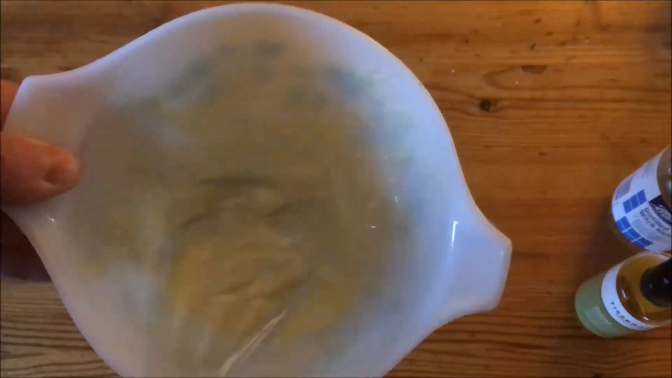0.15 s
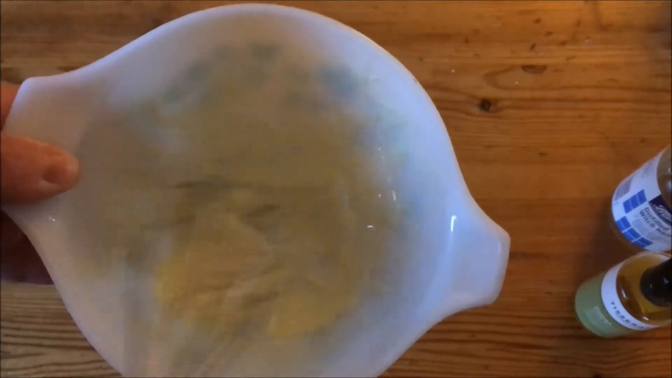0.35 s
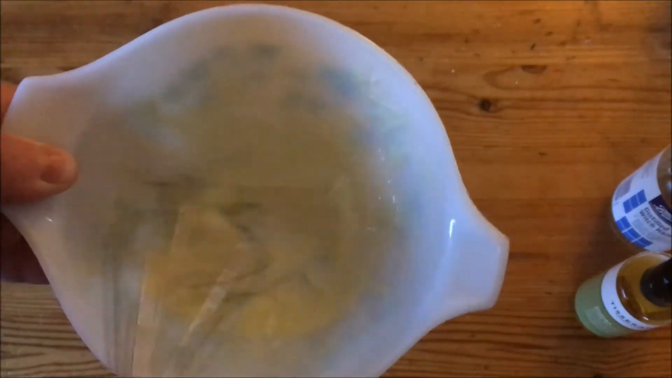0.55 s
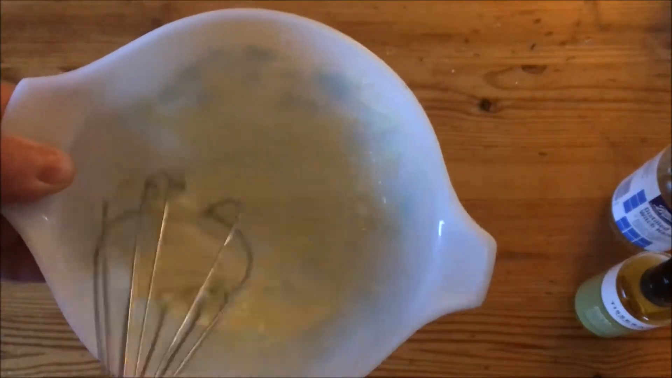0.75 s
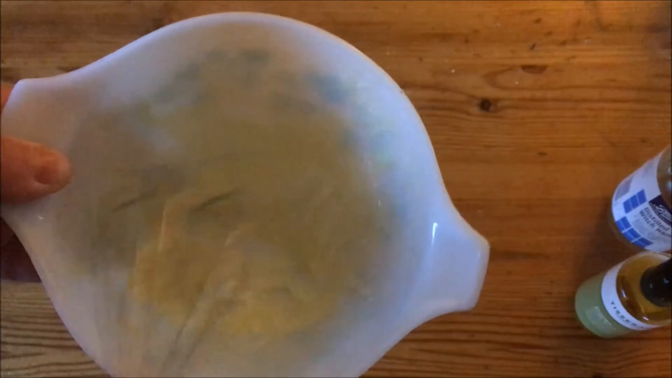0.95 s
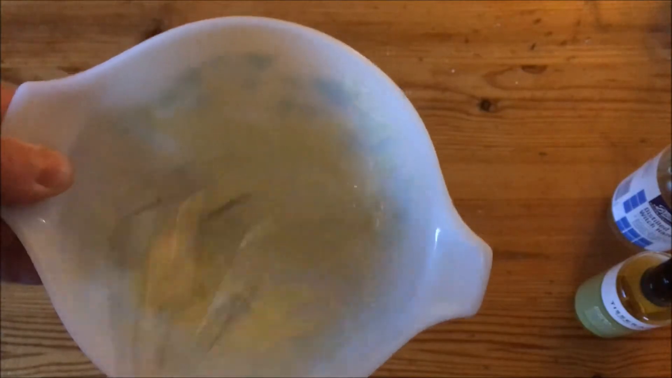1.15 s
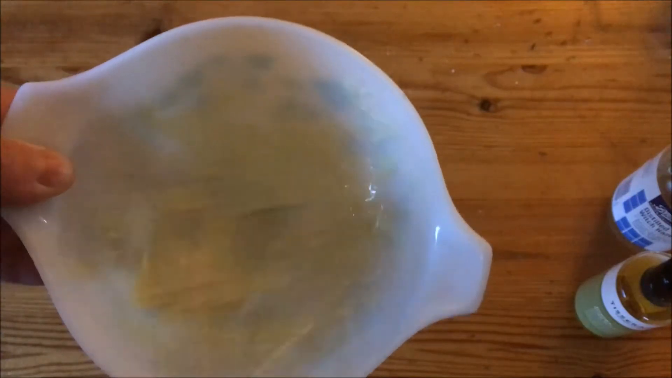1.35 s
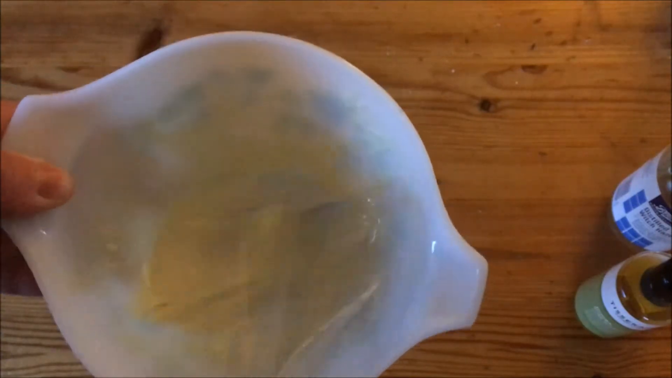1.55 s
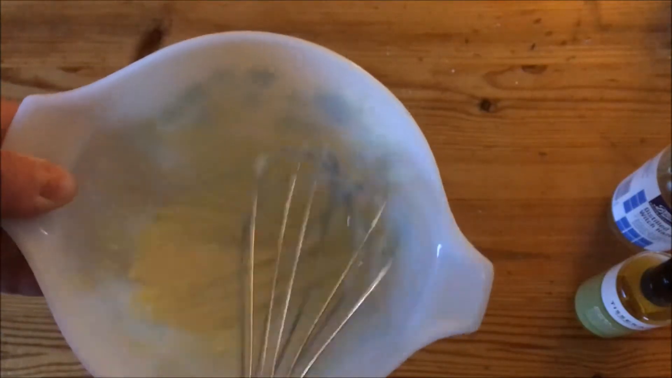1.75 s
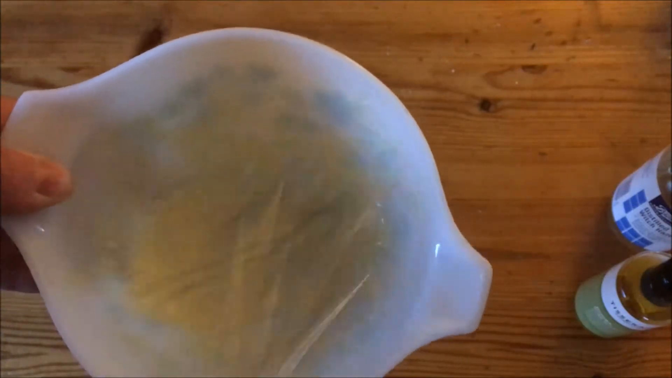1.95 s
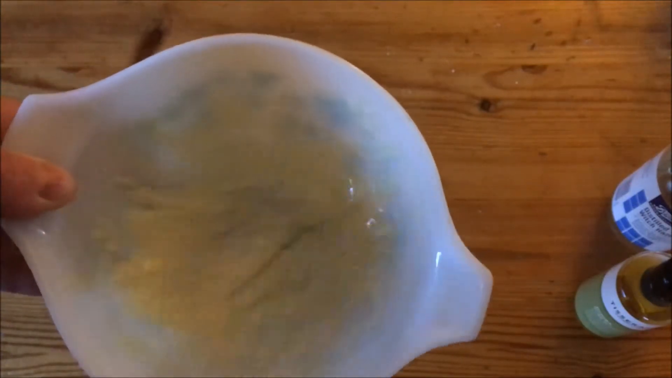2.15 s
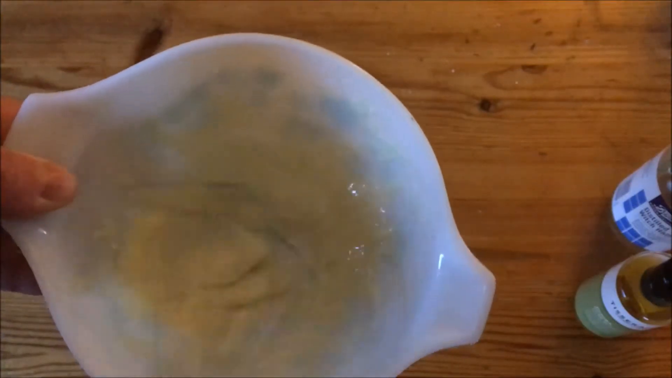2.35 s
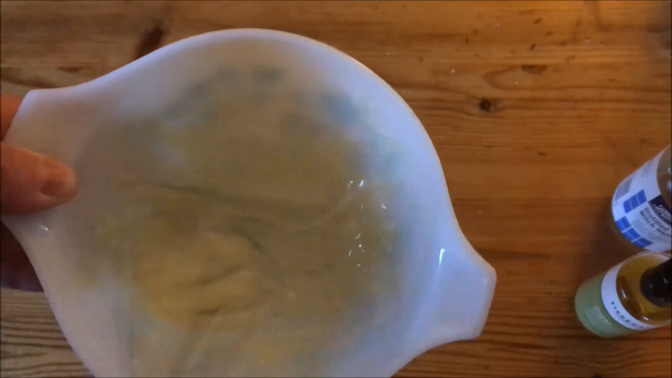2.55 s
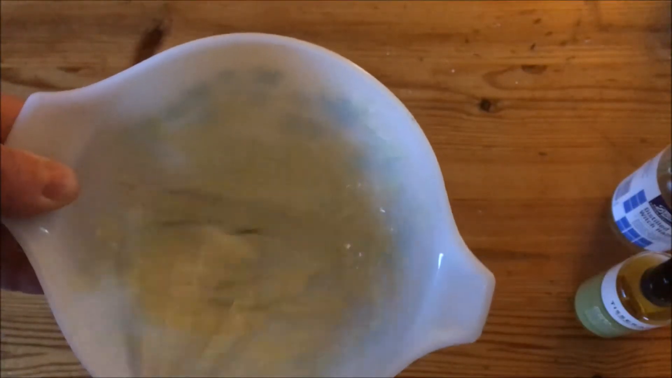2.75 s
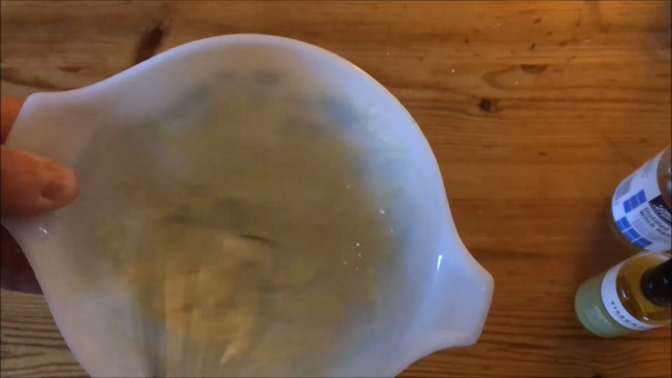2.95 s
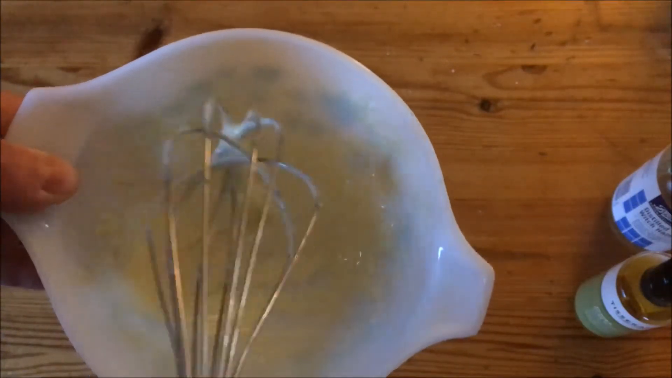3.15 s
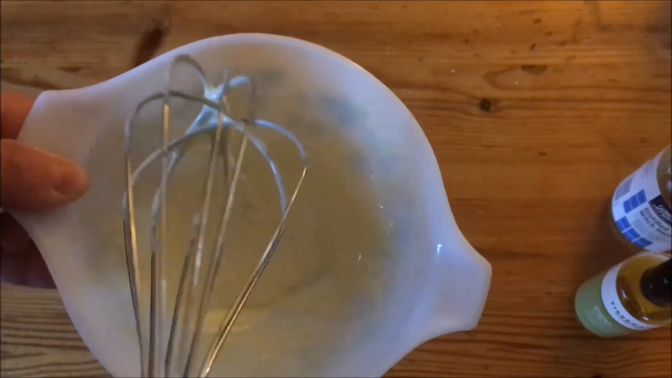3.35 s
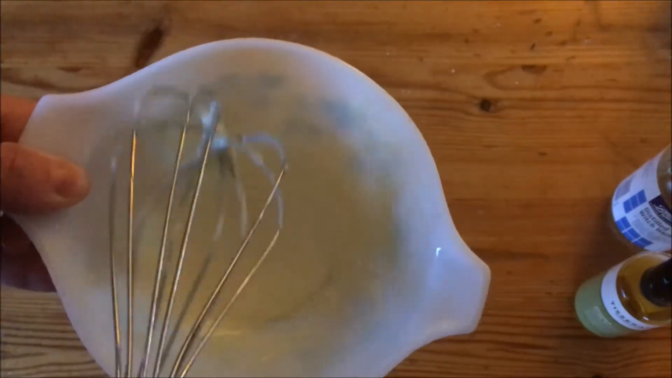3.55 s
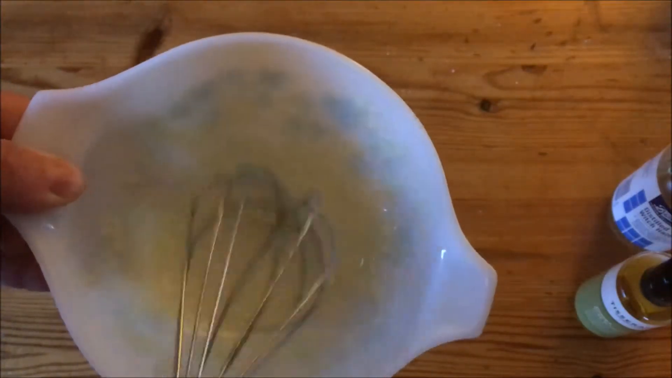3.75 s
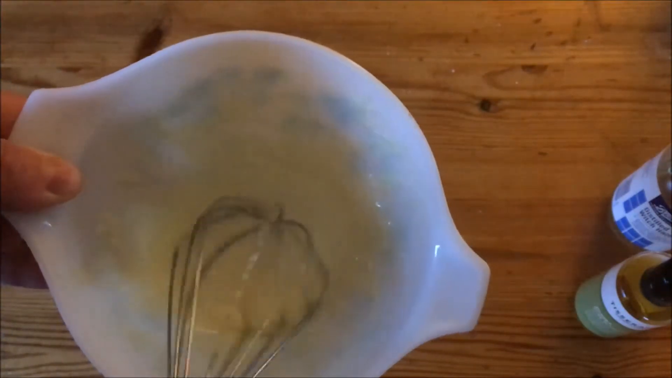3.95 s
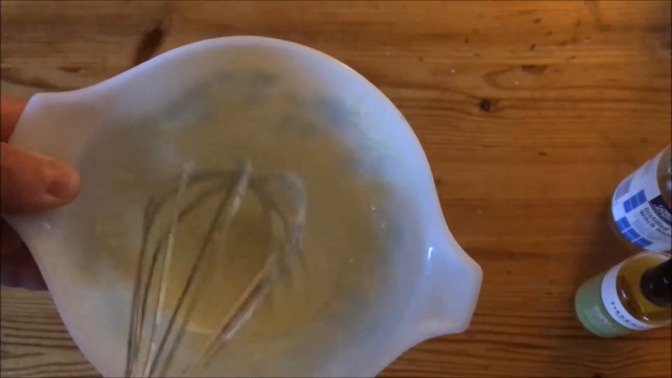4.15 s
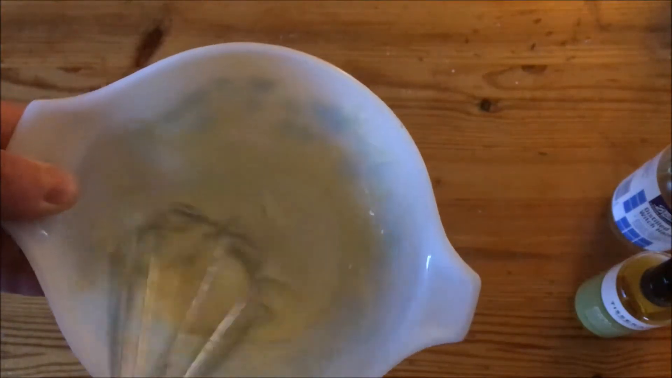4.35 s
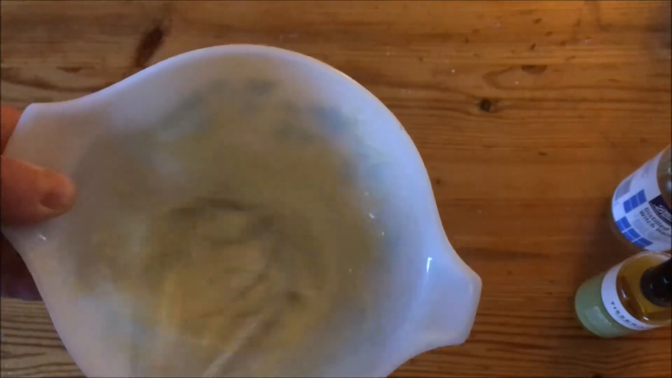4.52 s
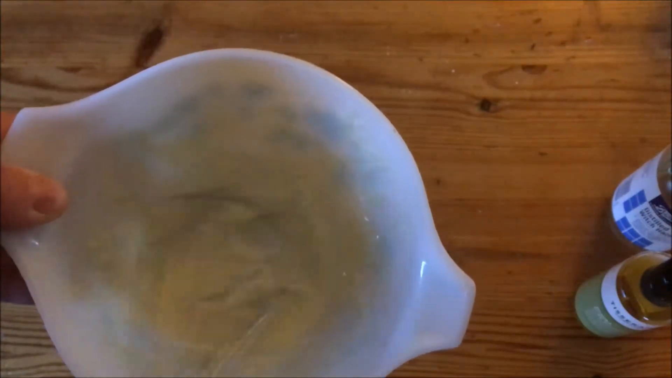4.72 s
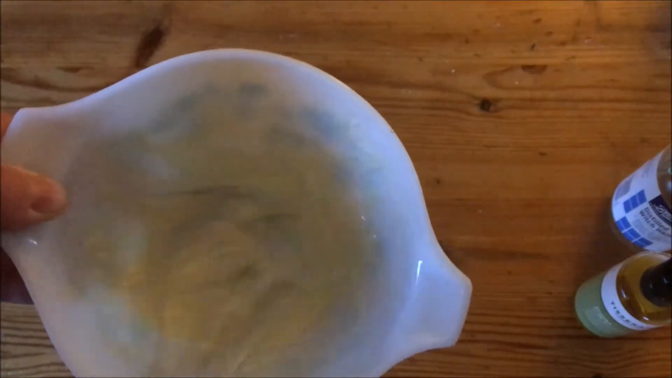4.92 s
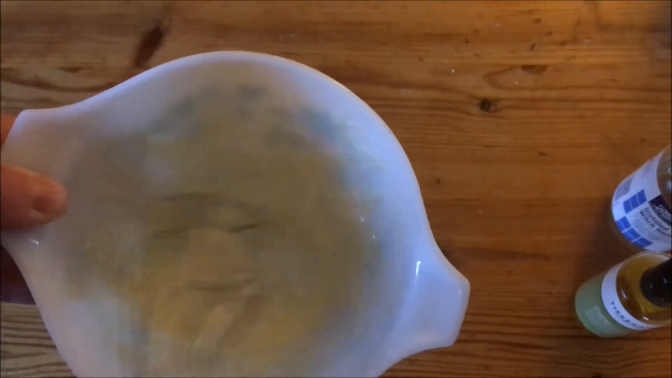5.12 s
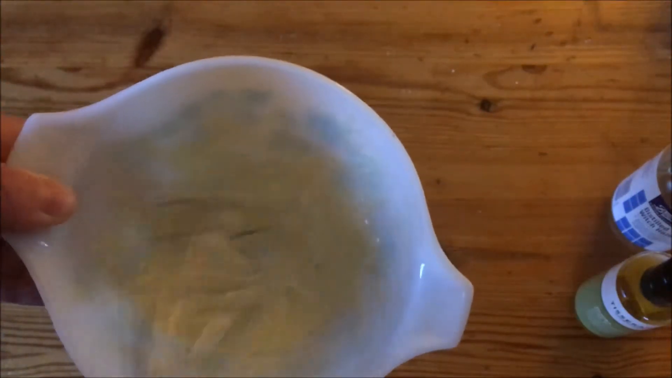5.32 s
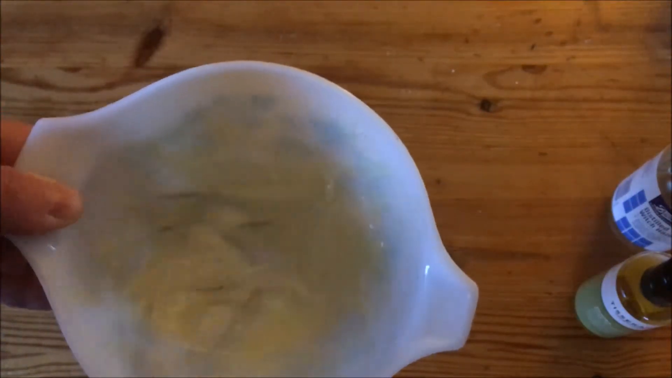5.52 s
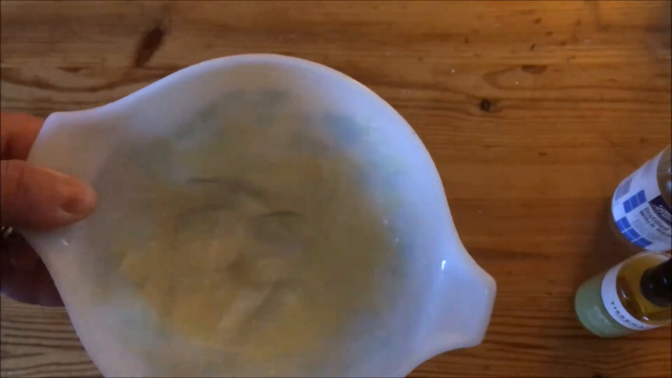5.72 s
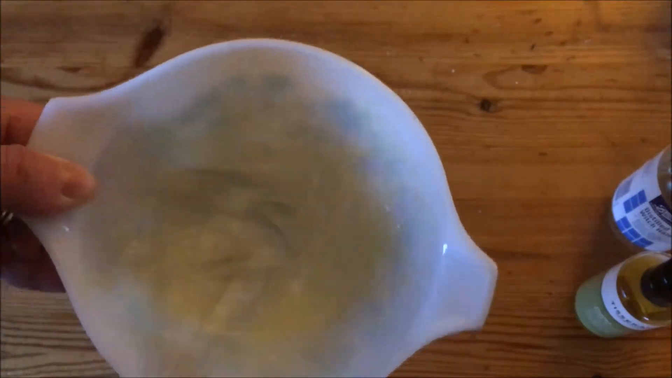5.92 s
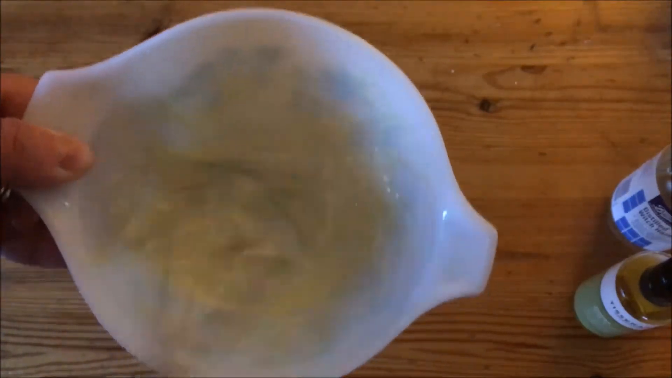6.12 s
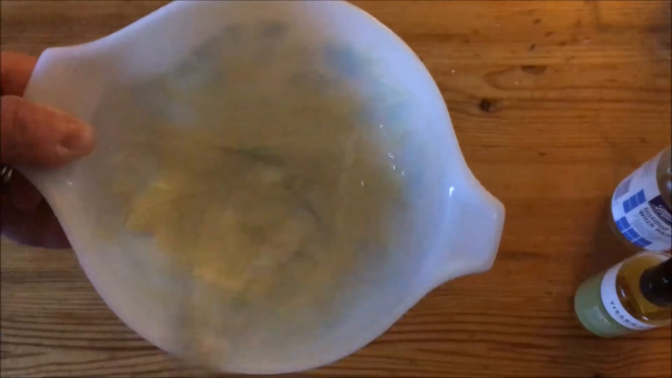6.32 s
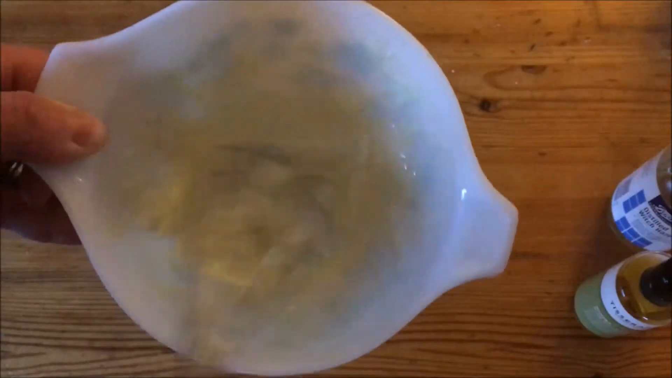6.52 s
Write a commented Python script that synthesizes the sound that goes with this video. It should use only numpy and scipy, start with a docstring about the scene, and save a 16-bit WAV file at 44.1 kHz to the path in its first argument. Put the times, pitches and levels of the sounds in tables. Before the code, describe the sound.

A wire whisk beats cream in a glass bowl in quick, rattling clicks, pausing briefly midway, in a quiet kitchen.

```python
"""A wire whisk beats cream in a glass bowl on a wooden table in a quiet kitchen.
At each stroke several wires strike the glass, rattle, and drag on through the cream.
Bowl and wires ring briefly, the table thuds and the walls add a short tail,
over low room rumble and microphone hiss."""
import sys
import numpy as np
from scipy import signal
from scipy.fft import rfft, irfft
from scipy.io import wavfile
from scipy.ndimage import uniform_filter1d

SR = 44100
rng = np.random.default_rng(int(sys.argv[2]) if len(sys.argv) > 2 else 0)


def dump_mix(stems):
    """Bounce the given channels to the path in sys.argv[1] as a 16-bit WAV at rate SR."""
    frames = np.atleast_2d(stems).T  # one column per channel
    limited = np.clip(frames, -1, 1)  # hard clip at full scale
    pcm = np.round(limited * 32767).astype(np.int16)
    wavfile.write(sys.argv[1], SR, pcm)


N = 294588


def gain_of(db):
    return 10 ** (np.asarray(db) / 20)


def unit_rms(x):
    return x / np.sqrt(np.mean(x ** 2) + 1e-20)


def butter(x, order, edge_hz, kind):
    return signal.sosfilt(signal.butter(order, edge_hz, kind, fs=SR, output="sos"), x)


def spectrum_gain(grid_hz, points):
    """Unit-RMS gain curve through (freq_hz, level_db) points."""
    freq_hz, level_db = np.transpose(points)
    return unit_rms(gain_of(np.interp(np.log(grid_hz + 1), np.log(freq_hz), level_db)))


def coloured_noise(points):
    gain = spectrum_gain(np.fft.rfftfreq(N, 1 / SR), points)
    return irfft(rfft(rng.standard_normal(N)) * gain, N)


def minimum_phase_impulse(points):
    grid_hz = abs(np.fft.fftfreq(4096, 1 / SR))
    log_gain = np.log(spectrum_gain(grid_hz, points))
    spectrum = np.exp(signal.hilbert(log_gain).conj())
    return np.fft.ifft(spectrum).real[:len(grid_hz) // 2]


def chatter(count, grain_s, spread_db=3):
    """Many tiny knocks: noise whose level jumps from grain to grain."""
    lumps = unit_rms(uniform_filter1d(rng.standard_normal(count), round(grain_s * SR)))
    return unit_rms(rng.standard_normal(count) * gain_of(spread_db * lumps))


def room_rumble():
    """Steady low noise, strongest near 50 Hz."""
    # rumble spectrum: freq_hz, relative_db
    spectrum = [(20, -17), (36, -13), (51, -0.5), (80, -7), (140, -11), (190, -8.5), (300, -15.5),
                (1500, -41.5)]
    return gain_of(-61.5) * coloured_noise(spectrum)


def microphone_hiss():
    """Broad hiss, about 10 dB lower from 3.4 to 4.6 s."""
    # hiss spectrum: freq_hz, relative_db
    spectrum = [(300, -25), (500, -5), (1200, -7), (4800, -12), (7500, -11), (10500, -13), (13000, -9),
                (15800, -9)]
    # hiss envelope: time_s, level_db
    envelope = [(0, -64), (3.398, -64), (3.402, -74), (4.55, -73), (4.6, -64)]
    level_db = np.interp(np.arange(N) / SR, *np.transpose(envelope))
    return gain_of(level_db) * coloured_noise(spectrum)


def bowl_response(free_db, favoured_hz):
    """Impulse responses of bowl body, bowl wall and wires: a broad crack plus rings."""
    # steel on glass: freq_hz, relative_db
    crack_spectrum = [(440, -18), (783, 9.5), (1590, 3), (2650, 5), (4780, 1), (7000, 11), (12500, 6.5),
                      (15500, 5)]
    # rings damped by cream and hand: pitch_hz, level_db, t60_s
    damped_rings = [(690, -6, .035), (790, -1, 0.04), (845, -11, 0.15), (999.4, -5, .05),
                    (1350, -4.5, 0.024), (2260, -7, 0.035), (2683, -6, 0.02), (3260, -7.5, 0.015),
                    (4196, -7, 0.015), (5465, -6, 0.03), (8900, -12, 0.025), (9870, -3, 0.022),
                    (11330, -6, 0.025), (13360, -8, 0.01)]
    # thin rings once the wires bounce clear: pitch_hz, level_db, t60_s
    free_rings = [(1873, -13, 0.14), (3200, -15, 0.12), (3700, -9, 0.12), (5820, -13, 0.1),
                  (7150, -3, 0.08), (9600, -16, 0.06), (11360, -7, 0.06), (12500, -13, 0.08),
                  (13200, -11, 0.08), (13750, -6, 0.07)]
    splits_hz = [1500, 6500]  # body | wall | wires
    t = np.arange(SR // 5) / SR
    crack = minimum_phase_impulse(crack_spectrum)
    bands = np.zeros((3, len(t)))
    bands[0, :len(crack)] = butter(crack, 2, splits_hz[0], "low")
    bands[1, :len(crack)] = butter(crack, 2, splits_hz, "band")
    bands[2, :len(crack)] = butter(crack, 2, splits_hz[1], "high")
    rings = damped_rings + [(hz, db + free_db, t60_s) for hz, db, t60_s in free_rings]
    for pitch_hz, level_db, t60_s in rings:
        scatter, detune = rng.standard_normal(2)
        nearness = np.exp(-(np.log(pitch_hz / favoured_hz) / 0.034) ** 2)
        spot_db = 7 * nearness + 3 * scatter - 4  # the struck spot favours one ring
        pitch_hz *= 1 + 0.0004 * detune / t60_s  # grip and cream detune damped rings most
        ring = np.sin(2 * np.pi * pitch_hz * t) * gain_of(-60 * t / t60_s) / np.sqrt(t60_s * SR)
        bands[np.searchsorted(splits_hz, pitch_hz)] += gain_of(level_db + spot_db) * ring
    return butter(bands, 4, 560, "high")  # a small bowl radiates no bass


def wire_knock(level_db, bands_db, t60_ms):
    """Force on body, wall and wires at one contact: a click, then a dying rattle."""
    rise_s, click_db = 0.00069, 9
    t = np.arange(SR // 5) / SR
    envelope = gain_of(level_db - 60 * (1000 * t / t60_ms) ** 1.3)  # holds while wires pile in
    envelope *= 1 - np.exp(-t / rise_s)
    force = envelope * chatter(len(t), grain_s=0.0008)
    force[0] = gain_of(level_db + click_db)
    return gain_of(bands_db)[:, None] * force


def cream_drag(level_db, fall_20db_ms):
    """Force of wires dragging through cream: body, wall and wires catch and slip separately."""
    rise_s, bands_db = 0.0034, [3.6, -1, -11]
    t = np.arange(SR // 5) / SR
    envelope = gain_of(level_db - 20 * (1000 * t / fall_20db_ms) ** 1.4)
    envelope *= 1 - np.exp(-t / rise_s)
    scrape = [chatter(len(t), grain_s=0.006) for _ in bands_db]
    return gain_of(bands_db)[:, None] * envelope * scrape


def whisk():
    """Each stroke drives the bowl with a blow and a drag; lone wires tap before and after."""
    # strokes: start_s, blow_db, rattle_t60_ms, drag_db, drag_fall_20db_ms, free_db, favoured_hz
    strokes = [(0.033, -9.5, 33, -27.5, 40, -14, 2670), (0.2207, -4, 21.4, -38, 69, -18, 2260),
               (0.4097, -5.5, 27.5, -36, 85, -7, 4200), (0.5992, -5, 19.4, -26.5, 55, -14, 2680),
               (0.7807, 0.5, 12.4, -26.5, 44, -9, 2680), (0.9596, -3.5, 21.8, -29.5, 60, -36, 2260),
               (1.1344, -11.5, 60, -33, 74, -13.5, 1000), (1.314, -18, 24, -32.5, 99, 4, 4200),
               (1.4928, -22.5, 90, -34.5, 96, -5.5, 5460), (1.709, -9.5, 26.8, -33, 59, -18, 790),
               (1.8797, -9, 39.6, -33, 69, -14, 1000), (2.0638, -6, 21, -29.5, 64, -8.5, 790),
               (2.2505, -7, 14, -31.5, 64, -6, 2260), (2.434, -12, 42, -29.5, 52, -12.5, 2680),
               (2.6336, -7.5, 22.8, -22, 35, -5, 2680), (2.8067, -21, 71, -30, 60, -27.5, 2680),
               (2.9951, -9.5, 18.5, -33, 65, -11.5, 5460), (3.8781, -21, 23, -48.5, 53, -13.5, 2260),
               (3.99, -57, 32, -59.5, 138.5, -5, 3200), (4.4095, -13.5, 28, -44.5, 95, 2, 3700),
               (4.595, -10, 33, -38.5, 61, -16, 2680), (4.7925, -10, 19.7, -30.5, 51, -19, 1000),
               (4.9932, -7, 29, -32, 49, -31, 3260), (5.1806, -25, 89, -28.5, 49.5, 3.5, 2260),
               (5.3797, -12.5, 45, -35.5, 62, -18, 3260), (5.5894, -8.5, 29.4, -39.5, 132, -4.5, 2260),
               (5.7935, -9.5, 30, -36.5, 71, -14, 3260), (6.0014, -10.5, 24, -38, 84, -21.5, 2260),
               (6.1995, -8.5, 23, -26.5, 65, -14, 2260), (6.4034, -7.5, 36, -35.5, 71, 0, 2680),
               (6.5996, -6, 30.6, -34, 77, -22.5, 3260)]
    # blow colour: time_s, body_re_wires_db, wall_re_wires_db
    blow_colour = [(0, 1.5, 3.5), (1.2, 0, 1.5), (2, -1.5, 2.5), (3, -1.5, 1), (3.9, 4, 1), (4.6, -1.5, 1),
                   (5.4, 2.5, 3), (5.9, -1, 3.5), (6.6, -2, 3)]
    # lone wire contacts: start_s, level_db, tilt_to_body_db
    taps = [(0.0078, -21.5, 5), (0.0223, -25.5, -2), (0.2087, -27.5, -0.5), (0.217, -5.5, -1.5),
            (0.4013, -19.5, 4), (0.587, -17.5, 1), (0.759, -27, 1.5), (0.937, -35, -1.5), (0.9501, -27, 0),
            (1.1193, -30, -1), (1.1404, -8.5, 5), (1.1466, -14, -3.5), (1.3183, -27.5, -14.5),
            (1.3683, -38, -6.5), (1.385, -22, -1), (1.49, -21, -14.5), (1.5229, -19.5, -3),
            (1.6607, -27.5, 7), (1.6692, -27, 0.5), (1.695, -19, -4.5), (1.7502, -35.5, -4),
            (1.841, -42, -2), (1.8544, -31.5, -1), (1.8732, -26, -3), (2.0388, -19.5, -0.5),
            (2.0505, -16, 0), (2.0683, -14.5, 2.5), (2.2147, -14, 2), (2.2544, -19.5, 6.5),
            (2.2833, -22.5, 0.5), (2.3968, -28.5, 2), (2.4147, -19.5, 1), (2.4237, -20, -3),
            (2.4395, -16.5, 9.5), (2.476, -27, -0.5), (2.6102, -31.5, 3), (2.615, -34, -11),
            (2.6255, -29.5, -1), (2.765, -45, -5), (2.785, -36, 4), (2.7983, -23.5, 0.5),
            (2.8106, -19.5, 2.5), (2.816, -18.5, -4), (2.8264, -33, 13.5), (2.988, -14, 10),
            (3.0358, -39.5, -8), (3.2077, -42.5, -4), (3.5836, -52.5, -7.5), (3.8664, -34.5, -9.5),
            (3.896, -40.5, 1.5), (4.007, -57, 6.5), (4.02, -48.5, -0.5), (4.039, -49, 1),
            (4.3887, -26.5, 5), (4.419, -22, -9), (4.559, -48.5, -9), (4.5859, -13.5, -0.5),
            (4.5986, -29, 25), (4.6064, -19.5, -5), (4.766, -30, 15), (4.7888, -21.5, 0), (4.969, -38, -7),
            (4.982, -22, 15.5), (4.9891, -15, -1.5), (5.168, -15.5, 1.5), (5.1719, -25.5, 7.5),
            (5.1866, -14, -4.5), (5.37, -19, -2), (5.3849, -24, 11), (5.566, -35, 1.5), (5.5831, -25.5, -3),
            (5.7828, -19, -2), (5.9834, -22.5, 12), (6.0421, -25, 1.5), (6.169, -36, 1),
            (6.2365, -20.5, 2.5), (6.371, -37, 1), (6.3931, -33.5, 20.5), (6.4452, -23.5, 1.5),
            (6.5884, -23, 8)]
    lone_t60_ms, bounce_t60_ms, bounce_window_s = 3.1, 16.8, 0.06
    sunk_db = -13.5  # free rings with the wires in the cream
    bowls = [bowl_response(free_db, hz) for *_, free_db, hz in strokes]
    sunk_bowls = [bowl_response(free_db + sunk_db, hz) for *_, free_db, hz in strokes]
    out = np.zeros(N)

    def excite(start_s, bowl, force):
        sound = signal.fftconvolve(force, bowl, axes=1).sum(0)
        span = out[round(start_s * SR):][:len(sound)]
        span += sound[:len(span)]

    time_s, body_db, wall_db = np.transpose(blow_colour)
    for (start_s, blow_db, t60_ms, drag_db, fall_ms, *_), bowl in zip(strokes, bowls):
        bands_db = [np.interp(start_s, time_s, body_db), np.interp(start_s, time_s, wall_db), 0]
        excite(start_s, bowl, wire_knock(blow_db, bands_db, t60_ms))
        excite(start_s, bowl, cream_drag(drag_db, fall_ms))
    stroke_starts_s = np.array(strokes)[:, 0]
    for start_s, level_db, tilt_db in taps:
        nearest = abs(stroke_starts_s - start_s).argmin()
        bands_db = [0.86 + tilt_db, 4.2, -0.32 - tilt_db]
        if 0 < start_s - stroke_starts_s[nearest] < bounce_window_s:
            excite(start_s, bowls[nearest], wire_knock(level_db, bands_db, bounce_t60_ms))
        else:
            excite(start_s, sunk_bowls[nearest], wire_knock(level_db, bands_db, lone_t60_ms))
    return out


def table_thud(beating):
    """The bowl passes each blow to two damped modes of the wooden top."""
    t = np.arange(SR // 8) / SR
    thud = np.sin(2 * np.pi * 220 * t) * gain_of(-60 * t / 0.046)
    thud += 1.4 * np.sin(2 * np.pi * 340 * t) * gain_of(-60 * t / 0.056)
    push = butter(abs(beating), 2, 110, "high")
    return gain_of(-56.5) * signal.oaconvolve(push, thud)[:N]


def kitchen_reverb(beating):
    """A short, sparse tail of reflections."""
    t60_s, predelay_s, density = 0.27, 0.004, 0.05
    t = np.arange(SR // 4) / SR
    echoes = rng.choice([-1., 1.], len(t)) * (rng.random(len(t)) < density)
    echoes *= gain_of(-60 * t / t60_s) * (t > predelay_s)
    return gain_of(-22.5) * signal.oaconvolve(beating, echoes / np.linalg.norm(echoes))[:N]


def scene():
    beating = whisk()
    return (room_rumble() + beating + table_thud(beating) + kitchen_reverb(beating))[None]


def record(dry):
    """Adds microphone hiss, then a 16 kHz band limit."""
    lowpass = signal.firwin(161, 16000, window=("kaiser", 9), fs=SR)
    return signal.oaconvolve(dry + microphone_hiss(), lowpass[None], "same")


dry = scene()
out = record(dry)
dump_mix(out)
```